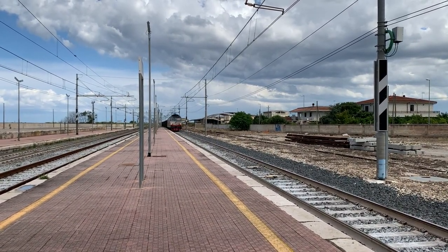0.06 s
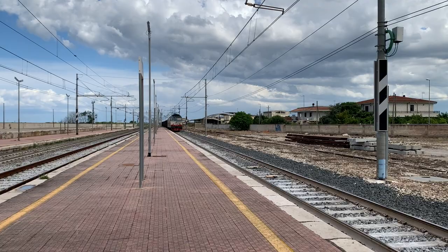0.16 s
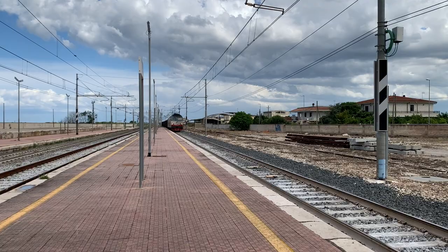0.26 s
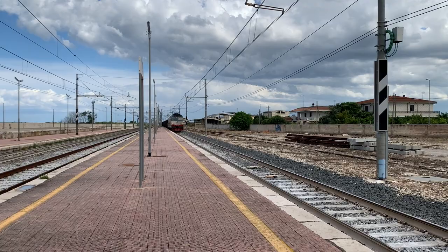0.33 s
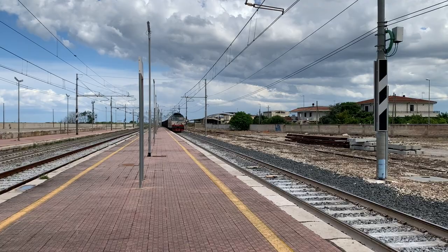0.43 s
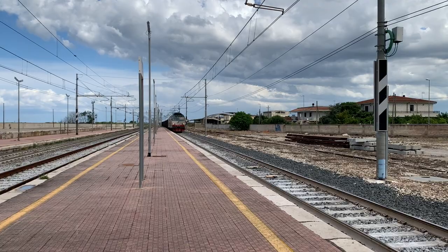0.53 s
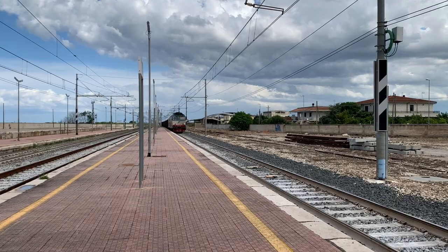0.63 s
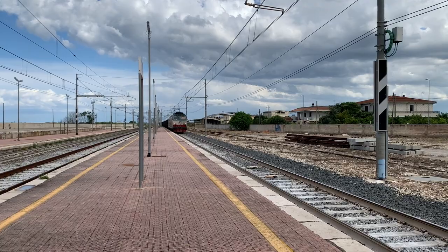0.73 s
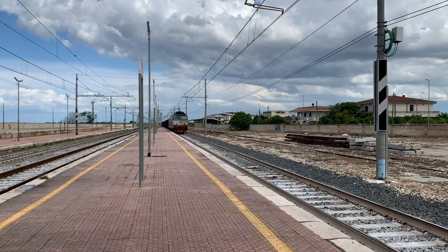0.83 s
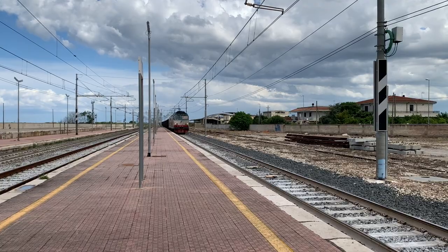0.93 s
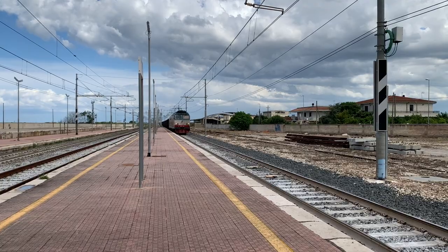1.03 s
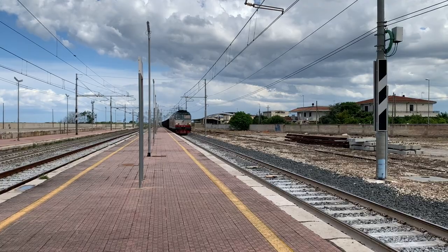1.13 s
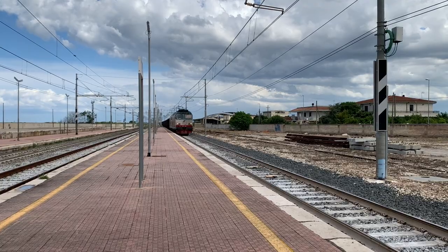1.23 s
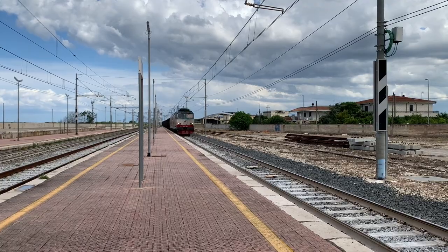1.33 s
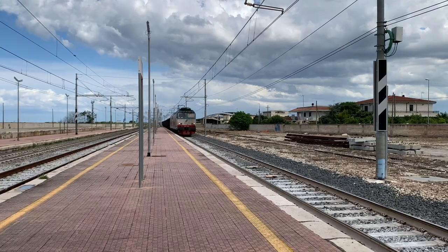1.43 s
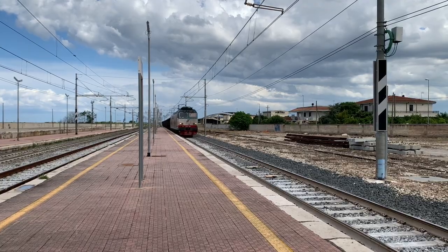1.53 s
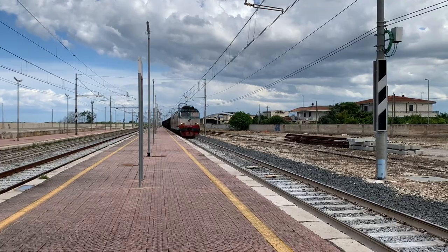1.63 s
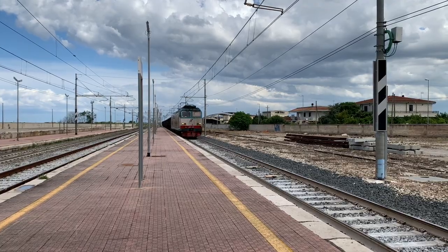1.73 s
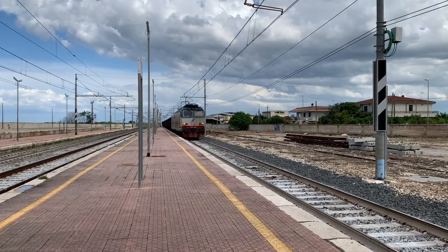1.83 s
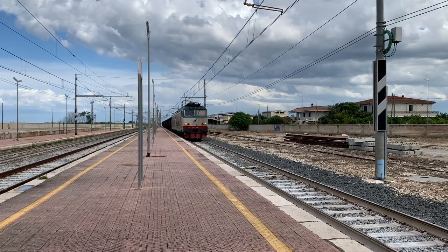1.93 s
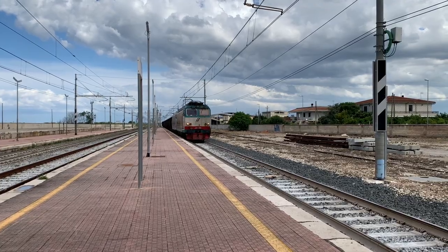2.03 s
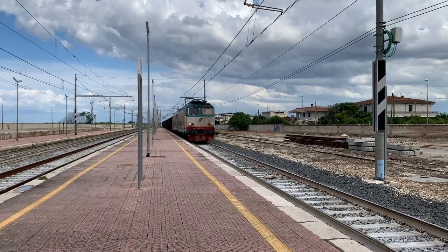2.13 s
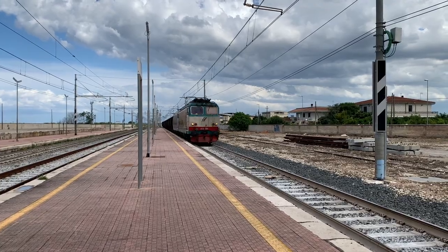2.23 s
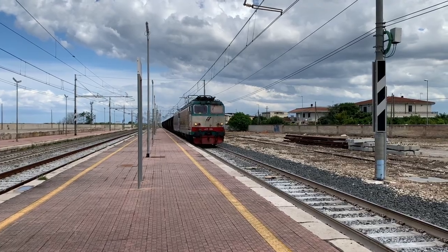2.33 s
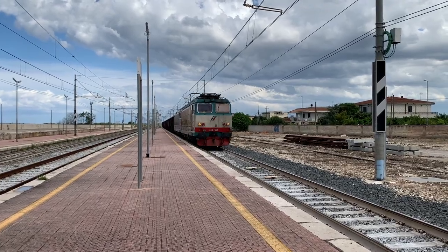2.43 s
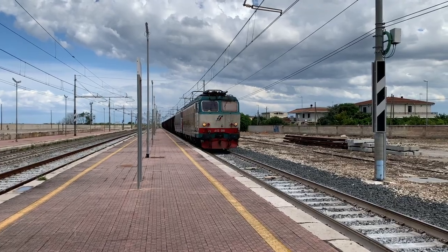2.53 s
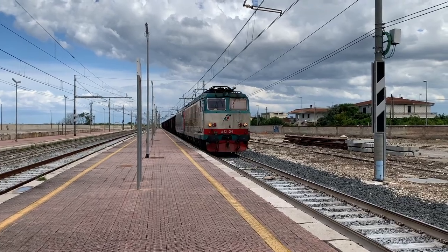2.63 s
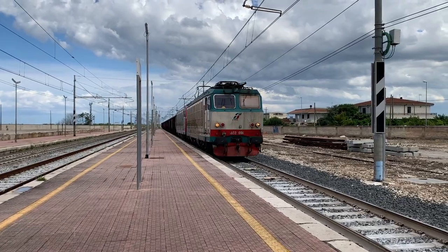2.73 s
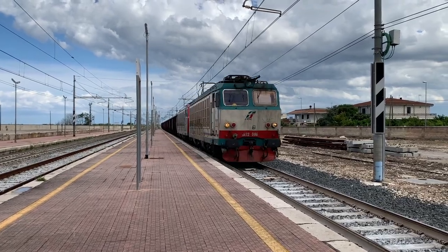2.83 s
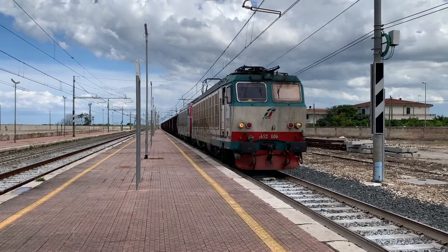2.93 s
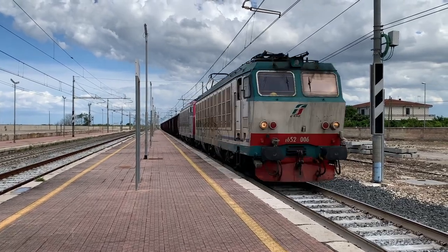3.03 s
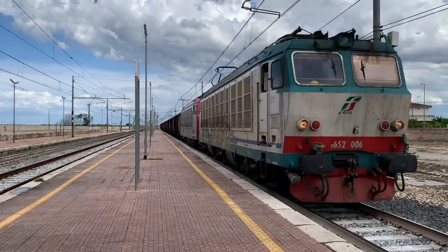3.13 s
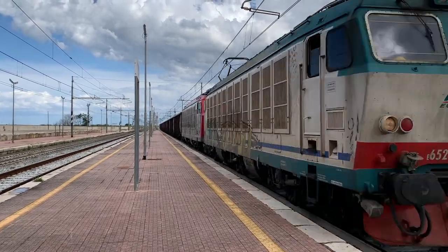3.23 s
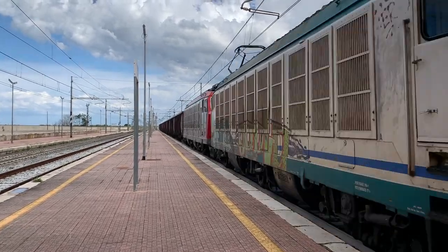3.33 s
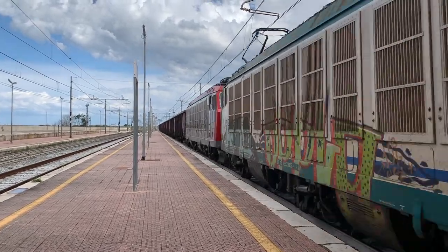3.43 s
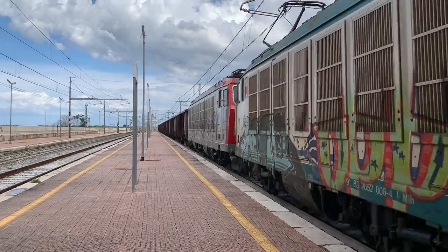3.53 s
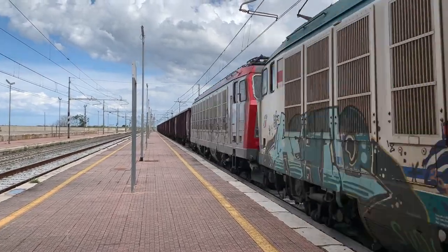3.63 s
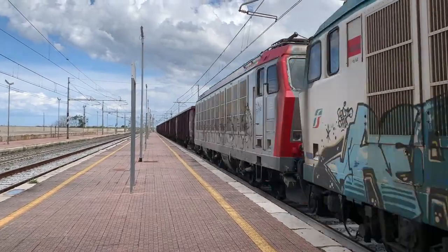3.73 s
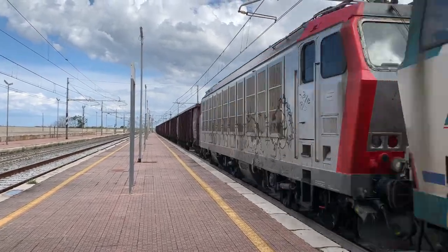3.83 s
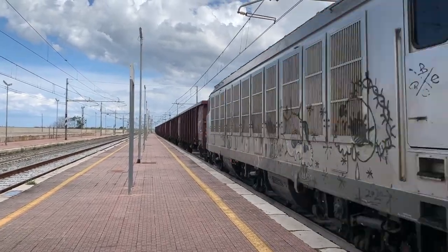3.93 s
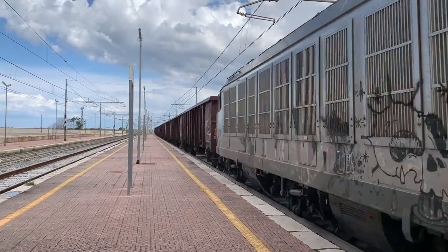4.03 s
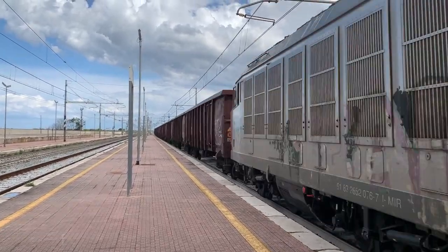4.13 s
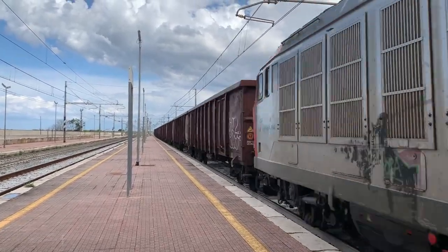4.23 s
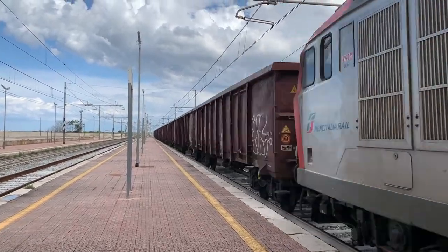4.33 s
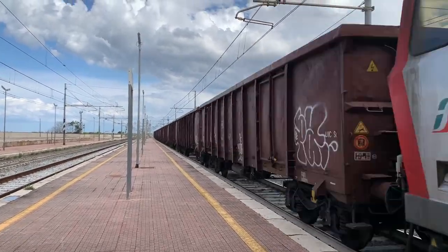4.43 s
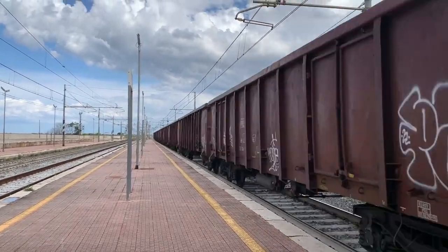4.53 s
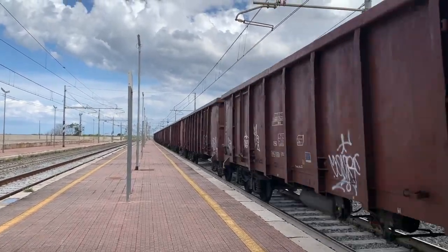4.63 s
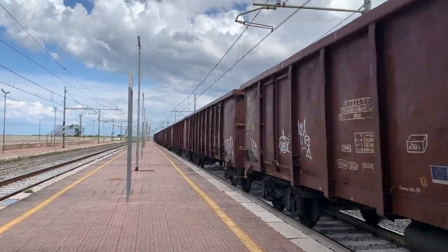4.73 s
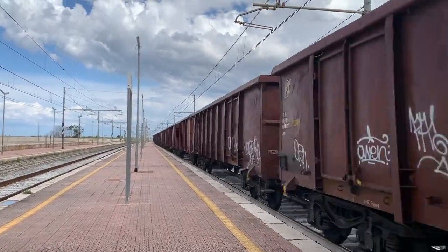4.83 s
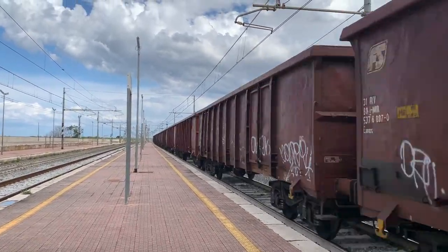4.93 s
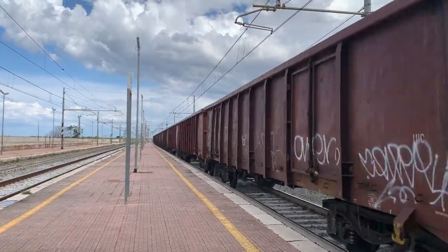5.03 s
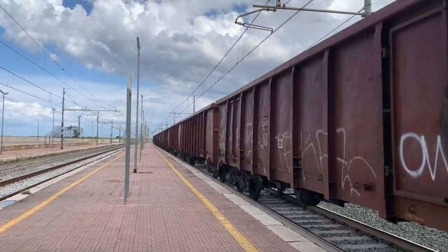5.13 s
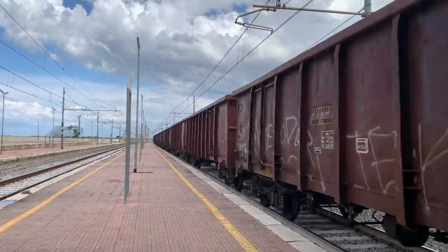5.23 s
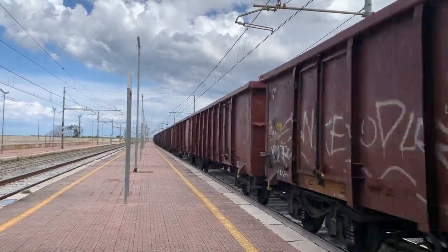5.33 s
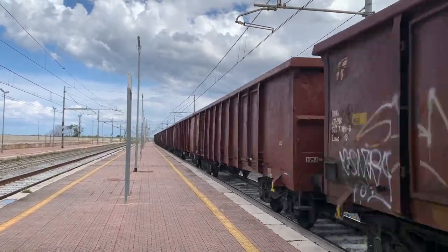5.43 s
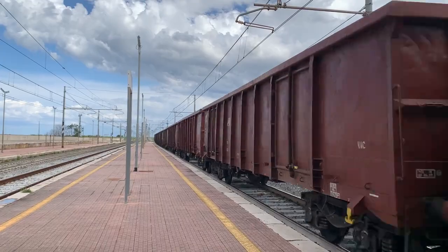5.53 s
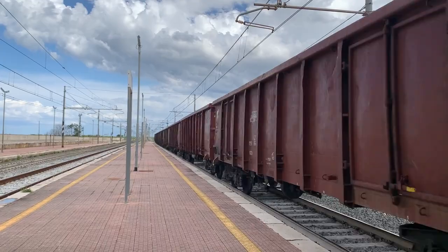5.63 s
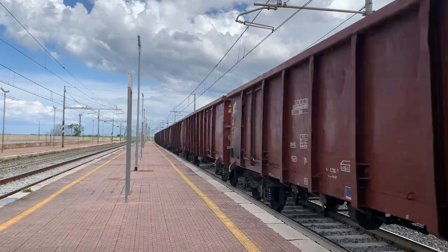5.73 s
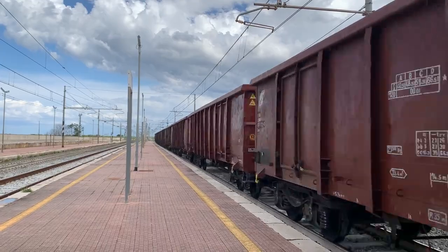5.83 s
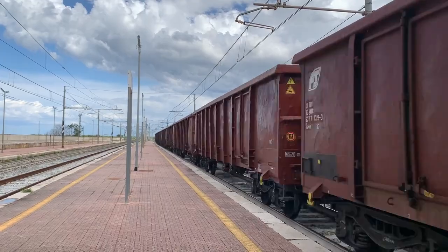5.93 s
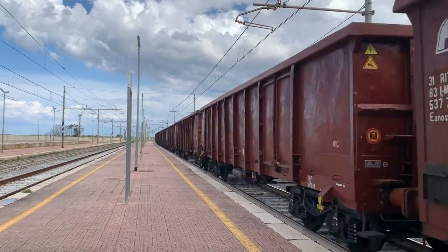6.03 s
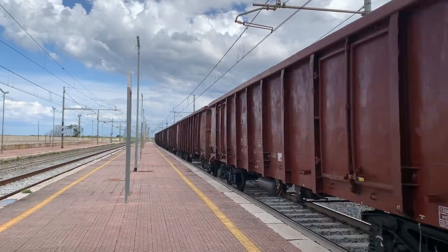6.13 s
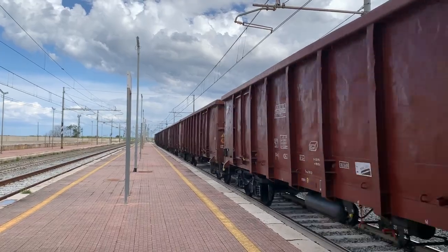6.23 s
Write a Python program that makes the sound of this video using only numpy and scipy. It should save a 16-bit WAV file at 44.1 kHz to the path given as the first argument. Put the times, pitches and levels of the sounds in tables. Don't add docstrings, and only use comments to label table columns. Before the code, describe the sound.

From 0 to about 0.35 seconds, the tail of a two-pipe air whistle, bright and breathy around 950 hertz with a lower pipe, cuts off and echoes shortly off houses. Wind then buffets the phone microphone with low, lumpy flutter and soft pops, strongest near 1 and 2 seconds. Behind it the rails sing metallically and a wavering gear whine comes and goes, both growing. From 2.4 seconds the train swells quickly; the whine drops in pitch around 2.6, with a thin sizzling hiss from the overhead wire. Around 3.2 the locomotives roar past very close, broad and rough. From 3.4 to 5 seconds the draught thumps and pops heavily on the microphone. After 4.4 the roar eases and empty steel wagons roll by with a higher, ringing wheel rush, swelling near 5.1, then slowly softening but continuing to the end at 6.3, with weaker wind.

```python
import sys
import numpy as np
from scipy import signal
from scipy.fft import rfft, irfft, next_fast_len
from scipy.io import wavfile
from scipy.ndimage import uniform_filter1d, map_coordinates

SR = 44100
rng = np.random.default_rng(int(sys.argv[2]) if len(sys.argv) > 2 else 0)


def wrap_up_sound(samples):
    columns = np.atleast_2d(samples).T
    tamed = np.clip(columns, -1, 1)
    steps = np.round(tamed * 32767).astype(np.int16)
    wavfile.write(sys.argv[1], SR, steps)


def to_linear_factor(level_db):
    exponent = np.asarray(level_db, float) / 20
    return 10 ** exponent


N = 276507


def unit(x):
    return x / np.sqrt(np.mean(x ** 2) + 1e-20)


def along(points, hz):
    f, v = np.transpose(points)
    return np.interp(np.log(hz + 1), np.log(f + 1), v)


def curves(rows):
    s, *cols = np.transpose(rows)
    return [np.interp(np.arange(N) / SR, s, c) for c in cols]


def bumps(times_s, sizes, half_s):
    t = np.arange(0, N / SR + .01, .002)
    bells = np.exp(-((t - times_s[:, None]) / half_s) ** 2)
    return np.interp(np.arange(N) / SR, t, sizes @ bells)


def wobble(rate_hz, count=N):
    at = np.arange(0, count + 8, 8)
    knots = rng.standard_normal(int(N * rate_hz / SR) + 4)
    return np.interp(np.arange(count), at, map_coordinates(knots, [at * rate_hz / SR]))


def filtered(x, response):
    m = next_fast_len(N + SR // 2)
    return irfft(rfft(x, m) * response(np.fft.rfftfreq(m, 1 / SR)), m)[..., :N]


def coloured(points):
    below, above = (points[0][0] / 2, -120), (points[-1][0] * 2, -120)
    return lambda hz: to_linear_factor(along([below] + list(points) + [above], hz))


def resonant(modes):
    return lambda hz: np.sqrt(sum(to_linear_factor(2 * db) / (1 + ((hz - centre) / (width / 2)) ** 2) ** 2
                                  for centre, width, db in modes))


def passing(at_s, reach_s):
    return -10 * np.log10(1 + ((np.arange(N) / SR - at_s) / reach_s) ** 2)


def together(a_db, b_db):
    return 10 * np.log10(to_linear_factor(2 * a_db) + to_linear_factor(2 * b_db))


# (frequency [Hz], left-right correlation [-1..1])
PORT_LIKENESS = [(60, .63), (300, .6), (600, .4), (1800, .52), (2400, .15), (3200, .3), (5500, .2),
                 (7000, .05)]
# (frequency [Hz], left lead [rad])
PORT_LEAD = [(300, 0), (700, -1.2), (1200, -1.6), (1800, -2.9), (3000, -5.5), (6000, -6.3)]
# (frequency [Hz], left minus right [dB])
PORT_LEAN = [(1500, 0), (2200, 1.5), (3500, 0), (5600, -2.5), (6400, 0)]


def rush(gain, patchy_db):
    z = signal.stft(rng.standard_normal((2, N)).astype(np.float32), nperseg=1024)[2]
    field = uniform_filter1d(rng.standard_normal(z.shape[1:]), size=4, axis=0)
    field = uniform_filter1d(field, size=6, axis=1)
    patches = to_linear_factor(patchy_db * unit(field)).astype(np.float32)
    pair = signal.istft(z * patches, nperseg=1024)[1][:, :N]
    m = next_fast_len(N + SR // 2)
    hz = np.fft.rfftfreq(m, 1 / SR)
    turn = np.arccos(np.clip(along(PORT_LIKENESS, hz), -1, 1)) / 2
    mid, side = rfft(pair, m) * gain(hz) * [np.cos(turn), np.sin(turn)]
    port = to_linear_factor(along(PORT_LEAN, hz) / 2) * np.exp(.5j * along(PORT_LEAD, hz))
    both = irfft(np.array([(mid + side) * port, (mid - side) / port]), m)[:, :N]
    return both / np.sqrt(np.mean(both.mean(axis=0) ** 2))


# (time [s], pitch [Hz], fundamental [dB], overblow [dB])
BRIGHT_PIPE = [(0, 987, -15.5, -2), (.04, 951, -30, -17.5), (.065, 971.5, -22, -12), (.1, 985, -17.5, -6),
               (.15, 990.3, -23.5, 0.5), (.175, 982, -25, -2.5), (.195, 962, -17.5, -11.5),
               (.23, 954, -28.5, -20), (.3, 947, -42, -36)]
# (level at full overblow [dB], growth with overblow [dB/dB], lag [s])
OVERTONES = [(-21.5, 1.06, -0.0042), (-30, 1.04, 0.0015), (-38.5, 0.81, -0.0097)]
# (partial number, level beside the fourth [dB])
HIGH_PARTIALS = [(5, -13), (6, -9), (7, -16), (8, -7.5)]
PARTIAL_LEAD_RAD = [1, -7, 4.5, 1.5, -3, -2.5, -5, 18]
# (time [s], pitch [Hz], level [dB])
LOW_PIPE = [(0, 850, -39), (.07, 845, -33), (.13, 905, -21.5), (.18, 862, -21.5), (.22, 850, -32),
            (.3, 825, -22), (.35, 820, -11), (.4, 830, -47)]


def whistle():
    n = SR // 2
    t = np.arange(n) / SR
    hz, first_db, blow_db = np.array(curves(BRIGHT_PIPE))[:, :n]
    dbs = [first_db]
    dbs += [db + growth * np.interp(t - lag_s, t, blow_db) for db, growth, lag_s in OVERTONES]
    dbs += [blow_db - 38.5 + db for _, db in HIGH_PARTIALS]
    turns = 2 * np.pi * np.cumsum(hz + 5.4 * wobble(70, count=n)) / SR
    out = 0
    for k, (db, lead) in enumerate(zip(dbs, PARTIAL_LEAD_RAD)):
        level = to_linear_factor(db + 4.5 + 0.8 * wobble(40.4, count=n))
        breath = 1 + .3 * wobble(300, count=n)
        out = out + level * breath * np.sin((k + 1) * turns + np.array([[.5], [-.5]]) * lead)
    low_hz, low_db = np.array(curves(LOW_PIPE))[:, :n]
    low_level = to_linear_factor(low_db - 3.5 + 1.3 * wobble(39.4, count=n))
    low_turns = 2 * np.pi * np.cumsum(low_hz + 8 * wobble(49.3, count=n)) / SR
    out = out + low_level * np.sin(low_turns + np.array([[.4], [-.4]]))
    valve = np.clip((.36 - t) / .1, 0, 1)
    return np.pad(out * valve, ((0, 0), (0, N - n)))


# (frequency [Hz], density [dB/Hz])
AIR_COLOUR = [(2300, -30), (2700, -6.5), (3800, -3), (5500, -1.5), (7000, -9), (7600, -24)]


def air():
    full_blow_db, growth = -42, .45
    blow_db = curves(BRIGHT_PIPE)[2]
    low_hz = curves(LOW_PIPE)[0]
    turns = 2 * np.pi * np.cumsum(low_hz + 22 * wobble(90)) / SR
    third = to_linear_factor(blow_db - 39) * (1 + .6 * wobble(120)) * np.sin(3 * turns)
    escape = to_linear_factor(full_blow_db + growth * blow_db) * rush(coloured(AIR_COLOUR), patchy_db=-1.0)
    valve = np.clip((.4 - np.arange(N) / SR) / .1, 0, 1)
    return valve * (third + escape)


# (frequency [Hz], T60 [s])
HOUSE_T60 = [(800, 0.59), (1300, 0.8), (2000, 0.17), (2900, 0.8), (5000, 0.2)]


def echo(x):
    hz, t, z = signal.stft(rng.standard_normal((2, SR)), SR, nperseg=256)
    decay = to_linear_factor(-60 * t / along(HOUSE_T60, hz)[:, None])
    tail = signal.istft(z * decay, SR, nperseg=256)[1]
    tail = tail / np.linalg.norm(tail, axis=1, keepdims=True)
    return signal.oaconvolve(x, tail, axes=1)[:, :N]


# (time [s], level [dB])
WIND_STRENGTH = [(0, -37), (.2, -31), (.4, -41.5), (.6, -32.5), (.78, -34), (.95, -27), (1.5, -29),
                 (2.05, -27), (2.4, -22.5), (2.9, -21.5), (3.2, -22), (3.45, -17), (3.7, -20),
                 (4.05, -17.5), (4.4, -22.5), (4.95, -24), (5.1, -32), (6.27, -29.5)]
# (time [s], buffet change [dB], flutter change [dB])
GUSTS = [(.1, 6.5, 4), (.26, -1, -7), (.56, 3, 1.5), (1.08, 8, 4.5), (2.02, -8, 6), (2.16, -1, 7),
         (3.0, -11, -6), (3.16, 3, 8.5), (3.42, 6, 3), (3.56, -3, -2), (3.67, -6, -4), (4.09, -4, -4),
         (3.1, -3, 2), (2.75, 3, 3), (5.2, 0, 5), (3.84, -4, 3), (4.36, 10, 16), (4.651, 1, 12.5),
         (4.74, -3, 9), (5.03, -8, -18), (5.56, 4, 5)]
# (frequency [Hz], density [dB/Hz])
BUFFET_COLOUR = [(12, -46.5), (20, -43), (47, 2.5), (92, 4.5), (170, -4), (220, -48), (370, -120)]
# (frequency [Hz], density [dB/Hz])
FLUTTER_COLOUR = [(90, -22.5), (150, -1.5), (240, 0), (330, -8), (500, -35), (900, -59)]


def wind():
    gust_half_s, flutter_db, flutter_growth = 0.028, -30, 0.79
    dip_share, dip_half_s = .7, .022
    strength_db, = curves(WIND_STRENGTH)
    s, *swells_db = np.transpose(GUSTS)
    buffet_swell_db, flutter_swell_db = [bumps(s, db, gust_half_s) for db in swells_db]
    bursts_s = np.transpose(EDDIES)[0] + .012
    left = np.clip(1 - bumps(bursts_s, np.full(len(EDDIES), dip_share), dip_half_s), .2, 1)
    buffet_db = strength_db + buffet_swell_db
    flutter_db = flutter_db + flutter_growth * (strength_db - strength_db.mean()) + flutter_swell_db
    lumps = wobble(13)
    slow = unit(to_linear_factor(1.4 * lumps) * rush(coloured(BUFFET_COLOUR), patchy_db=1.6))
    fast = unit(to_linear_factor(0.77 * lumps + 0.66 * wobble(32)) * rush(coloured(FLUTTER_COLOUR), patchy_db=1.5))
    return left * to_linear_factor(buffet_db + 1.5) * slow + to_linear_factor(flutter_db - 0.5) * fast


# (time [s], locomotives [dB], rolling wheels [dB])
TRAIN_LEVELS = [(0, -50, -38.5), (.6, -47, -40.5), (1.0, -42.5, -39), (1.5, -35.5, -37.5),
                (1.9, -33.5, -36), (2.4, -26, -32), (2.8, -23.5, -25.5), (3.2, -18.5, -26),
                (3.45, -21.5, -24), (4.0, -23, -29), (4.4, -22.5, -29), (4.6, -30.5, -26.5),
                (4.8, -26.5, -31), (5.1, -29, -23), (5.4, -30.5, -26.5), (5.6, -30, -26),
                (5.85, -31.5, -30.5), (6.27, -32.5, -32)]
# (time [s], narrow-mode share [0-1])
RAIL_SINGS = [(2.0, 0.63), (3.7, 0), (4.5, 0.07)]
# (frequency [Hz], width [Hz], level [dB])
RAIL_MODES = [(642, 40, -9.5), (820, 130, -2), (896, 17, 3.5), (952, 27, 2), (1058, 45, -2),
              (1173, 110, -0.5), (1298, 99, -2), (1518, 24, -6)]
# (frequency [Hz], width [Hz], level [dB])
RAIL_BODY = [(888, 420, -10), (1220, 290, -22.5)]
# (frequency [Hz], density [dB/Hz])
ROAR_COLOUR = [(120, -33), (200, 2), (400, -1), (560, -4.5), (800, -0.5), (1600, -6.5), (3000, -27.5),
               (5000, -36.5)]
# (frequency [Hz], width [Hz], level [dB])
WHEEL_MODES = [(1567, 590, -5.5), (1857, 350, 4), (2205, 660, 0), (2450, 380, -6), (2654, 210, -5.5),
               (3385, 610, -11.5), (4170, 580, -15)]


def train():
    roar_db, wheels_db = curves(TRAIN_LEVELS)
    axles_db = -23 + passing(at_s=3.17, reach_s=1.166)
    rails_db = together(axles_db, wheels_db - 2.5)
    sings = np.clip(curves(RAIL_SINGS)[0], 0, 1)
    uneven_db = .6 * wobble(9) + .7 * np.array([wobble(14), wobble(11), wobble(16)])
    ring = np.sqrt(sings) * rush(resonant(RAIL_MODES), patchy_db=1.5)
    ring = ring + np.sqrt(1 - sings) * rush(resonant(RAIL_BODY), patchy_db=4.0)
    rails = to_linear_factor(rails_db - 2.0 + uneven_db[0]) * ring
    roar = to_linear_factor(roar_db + 3.5 + uneven_db[1]) * rush(coloured(ROAR_COLOUR), patchy_db=2.06)
    wheels = to_linear_factor(wheels_db - 0.5 + uneven_db[2]) * rush(resonant(WHEEL_MODES), patchy_db=2.07)
    return rails + roar + wheels


# (frequency [Hz], density [dB/Hz])
SHEAR_COLOUR = [(2500, 7), (3300, -1.5), (4400, -2.5), (5200, -4.5), (7000, -6), (8500, -9)]
# (frequency [Hz], density [dB/Hz])
SIZZLE_COLOUR = [(7000, -31), (8500, -2.5), (10200, 2), (11300, -2), (11900, -6.5), (12100, -55)]
# (time [s], level [dB])
WIRE_LEVEL = [(0, -67), (1.5, -56.5), (2.6, -58), (3, -75)]
# (frequency [Hz], width [Hz], level [dB])
WIRE_MODE = [(9525, 60, 0)]


def hiss():
    roar_db, wheels_db = curves(TRAIN_LEVELS)
    shear_db = -20.5 + 0.31 * roar_db + 0.54 * wheels_db
    collector_db = -44.5 + passing(at_s=2.83, reach_s=0.55)
    sizzle_db = together(collector_db, wheels_db - 27)
    flicker_db = 0.28 * wobble(16)
    shear = to_linear_factor(shear_db + 8.5 + flicker_db) * rush(coloured(SHEAR_COLOUR), patchy_db=1.3)
    sizzle_level = to_linear_factor(sizzle_db + 2.5 + flicker_db + 0.98 * wobble(12))
    sizzle = sizzle_level * rush(coloured(SIZZLE_COLOUR), patchy_db=1.5)
    wire = to_linear_factor(curves(WIRE_LEVEL)[0]) * rush(resonant(WIRE_MODE), patchy_db=2.0)
    return shear + sizzle + wire


# (time [s], peak [dB], pitch [Hz], jab share [0-1])
EDDIES = [(0.236, -16.5, 100, 0.34), (0.372, -22, 67.3, 0.28), (0.763, -37, 89.6, 0.91),
          (0.931, -12.5, 79, 0.31), (0.975, -14.5, 73.8, 0.6), (1.07, -13.5, 51.1, 0.5),
          (1.416, -24, 233, 1), (1.686, -15, 88, 0.51), (1.779, -15, 105, 0.48), (1.993, -10.5, 87.5, 0.43),
          (3.376, -9.5, 115, 0.38), (3.602, -2, 76, 0.3), (3.912, -10, 85, 0.42), (3.965, -9, 80, 0.37),
          (4.289, -6.5, 74, 0.57), (3.938, -6.5, 104, 0.77), (4.019, -6.5, 127, 0.24), (4.257, -9, 88, 1),
          (4.354, -11.5, 214, 1), (4.412, -8.5, 75, 0.46), (4.653, -9, 112, 0.65), (4.742, -8, 170, 0.9),
          (3.495, -7.5, 100, 0.36), (4.97, -10.5, 71.6, 0.89), (5.056, -17.5, 114, 0.96)]


def pops():
    out = np.zeros((2, N + SR))
    t = np.arange(SR // 15) / SR
    for (s, db, hz, share), (a, b, pan) in zip(EDDIES, rng.random((len(EDDIES), 3))):
        envelope = t / .011 * np.exp(1 - t / .011)
        swing = envelope * -np.cos(2 * np.pi * (hz * (t - .009) + .15 * (a - .5)))
        jabs = sum(np.exp(-((t - at_s) / .0008) ** 2) for at_s in (.008, .012 + .003 * b))
        level = to_linear_factor(db - 2.0 + np.array([[4], [-4]]) * (pan - .5))
        start = round(s * SR)
        out[:, start:start + len(t)] += level * (swing - 2.1 * share * jabs)
    return filtered(out[:, :N], lambda hz: hz ** 2 / (hz ** 2 + 45 ** 2))


# (time [s], level [dB])
GEAR_LEVEL = [(.9, -82), (1.25, -29), (1.55, -40), (1.9, -31), (2.25, -37), (2.47, -25), (2.64, -37),
              (2.8, -20.5), (3.3, -34)]


def gears():
    own_hz, speed_m_s, level_s, sweep_s = 888, 26, 2.64, .045
    t = np.arange(N) / SR
    past_s = t - level_s
    hz = own_hz * (1 - speed_m_s / 343 * past_s / np.hypot(past_s, sweep_s))
    turns = 2 * np.pi * np.cumsum(hz + 8 * (950 / hz) ** 7 * wobble(30)) / SR
    heard = np.abs(t - 2.1) < 1.2
    level = to_linear_factor(curves(GEAR_LEVEL)[0] + 2.5 + 2.8 * wobble(29))
    return heard * level * np.sin(turns + np.array([[-.6], [.6]]))


# (frequency [Hz], width [Hz], level [dB])
WAGON_MODES = [(1905, 300, -2), (2503, 350, 3), (2755, 340, -4.5)]


def wagons():
    first_s, beside_wheels_db = 4.36, -6
    here = np.clip((np.arange(N) / SR - first_s) / 0.39, 0, 1)
    level = to_linear_factor(curves(TRAIN_LEVELS)[1] + beside_wheels_db + 0.97 * wobble(13))
    return here * level * rush(resonant(WAGON_MODES), patchy_db=2.0)


# (time [s], share [0-1])
GROUND_SHARE = [(1.5, .99), (2.4, 0.12), (3.2, 0.06), (3.45, 0.57), (4.5, 0.3), (5.0, .1)]
# (frequency [Hz], half width [Hz], depth [0-1])
GROUND_DIPS = [(1740, 170, 0.49), (2590, 250, 0.53)]


def grazing(x):
    def dips(hz):
        return sum(np.clip(depth, 0, 1) * np.exp(-((hz - centre) / half) ** 2)
                   for centre, half, depth in GROUND_DIPS)
    share = np.clip(curves(GROUND_SHARE)[0], 0, 1)
    return x - share * filtered(x, dips)


def scene():
    blast = whistle()
    houses = to_linear_factor(-10.5) * echo(blast)
    rolling = grazing(train() + gears() + hiss())
    return blast + air() + houses + wind() + rolling + pops() + wagons()


def starved(x, spare, chance_db, thin_db):
    hz, _, z = signal.stft(x, SR, nperseg=2048)
    band = (np.arcsinh(hz / 1500) * 19).astype(int)
    count = np.bincount(band)
    power = np.add.reduceat(np.abs(z) ** 2, np.cumsum(count) - count, axis=0) / count[:, None]
    power = np.abs(uniform_filter1d(power, size=3, axis=1)) + 1e-20
    near = np.abs(uniform_filter1d(power, size=9, axis=0))
    near = np.pad(near, ((2, 0), (0, 0)), mode="edge")[:-2] + 1e-20
    luck_db = chance_db * unit(uniform_filter1d(rng.standard_normal(power.shape), size=2, axis=1))
    spare_db = sum(along(part, hz) for part in spare)[:, None]
    kept = (10 * np.log10(power / near) + luck_db)[band] > -spare_db
    strong = np.abs(z) > to_linear_factor(thin_db) * np.sqrt(power[band])
    bass = (hz < 600)[:, None]
    return signal.istft(z * ((kept & strong) | bass), SR, nperseg=2048)[1][:N]


def roll_off(x):
    return signal.sosfilt(signal.butter(12, 12120, fs=SR, output="sos"), x)


# (frequency [Hz], depth [dB])
MID_SPARE = [(1450, 17), (1750, 6.5), (3000, 8), (4500, 5), (6500, 6.5), (7300, 3), (11300, 8), (12000, 4)]
# (frequency [Hz], depth change [dB])
DEAF_GAP = [(7250, 0), (7700, -12), (9100, -15.5), (9500, 0)]
# (frequency [Hz], depth [dB])
SIDE_SPARE = [(900, 10.5), (2000, 3.5), (3000, 9), (5700, 8.5), (6800, -2.5), (9500, 7), (10100, -0.5),
              (10600, -30)]


def record(dry):
    x = dry / (1 + np.abs(dry / .88) ** 6) ** (1 / 6)
    mid = starved((x[0] + x[1]) / 2, [MID_SPARE, DEAF_GAP], chance_db=4.0, thin_db=-3.5)
    side = starved((x[0] - x[1]) / 2, [SIDE_SPARE], chance_db=3.0, thin_db=-3.0)
    return roll_off(np.array([mid + side, mid - side]))


dry = scene()
out = record(dry)
wrap_up_sound(out)
```